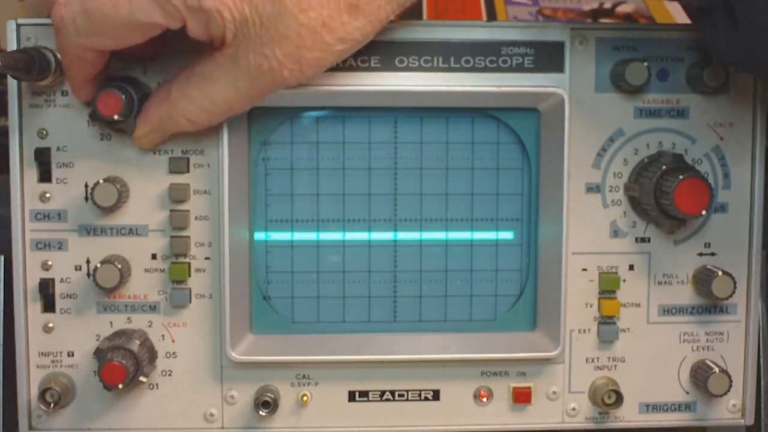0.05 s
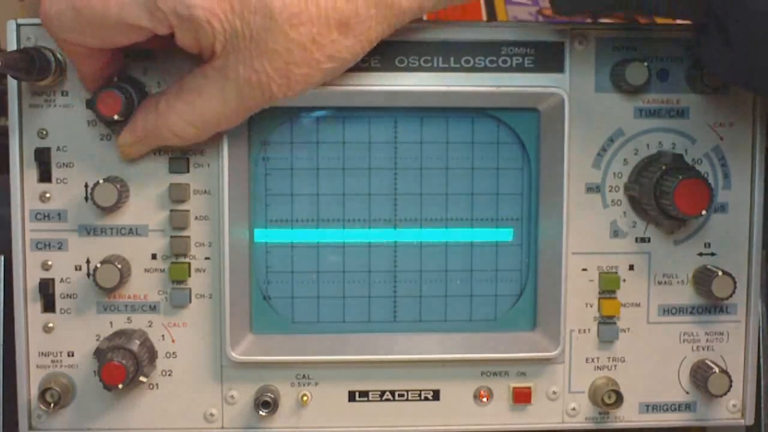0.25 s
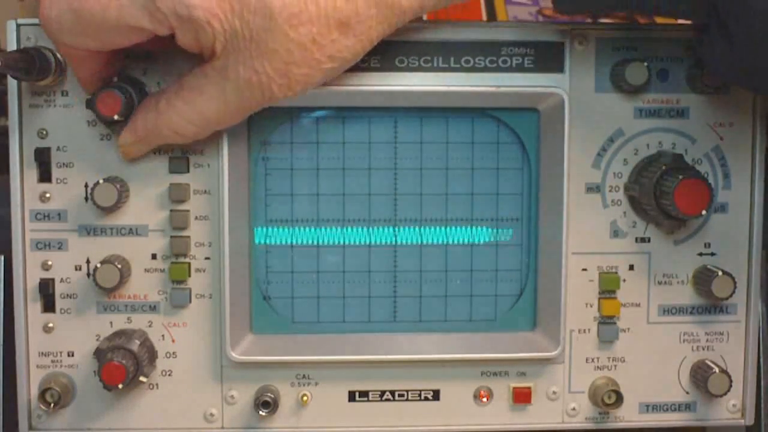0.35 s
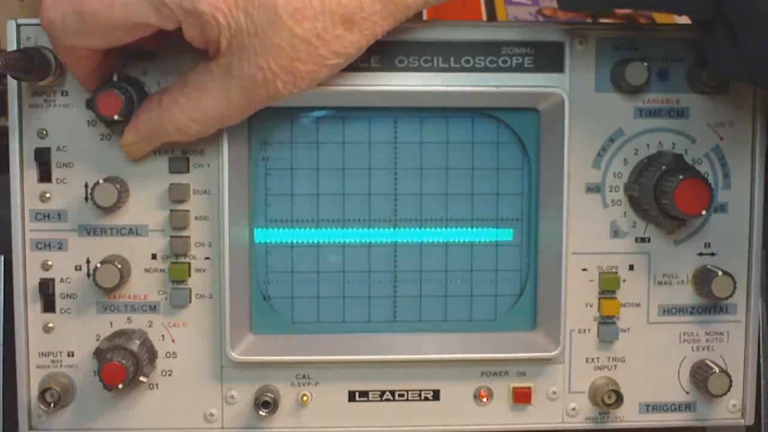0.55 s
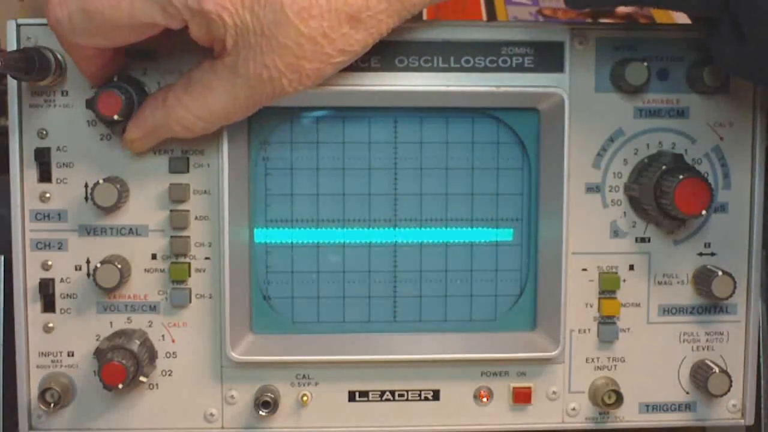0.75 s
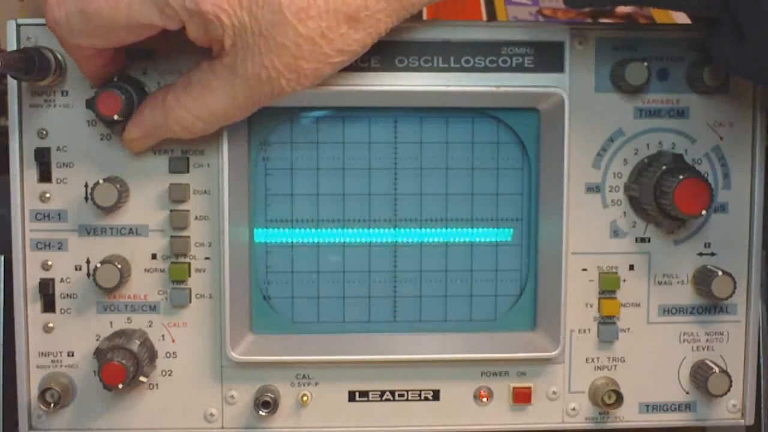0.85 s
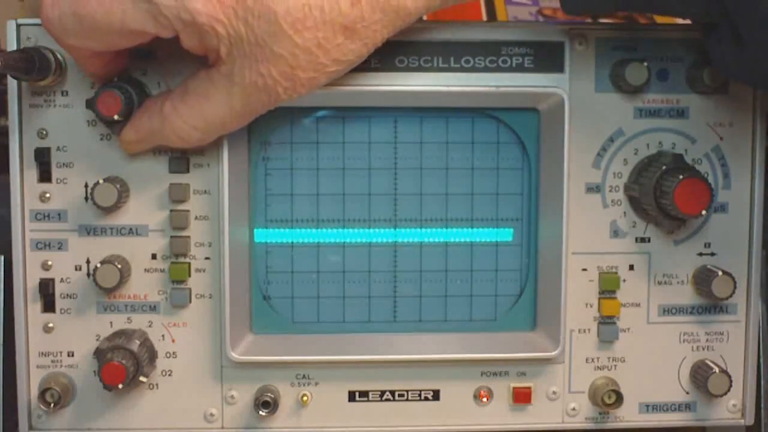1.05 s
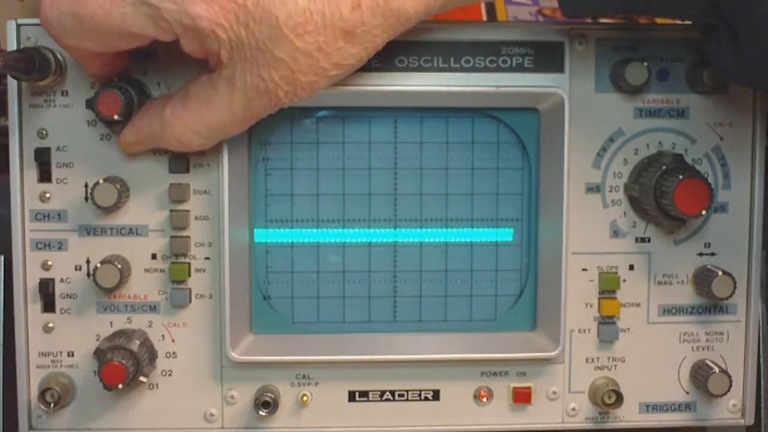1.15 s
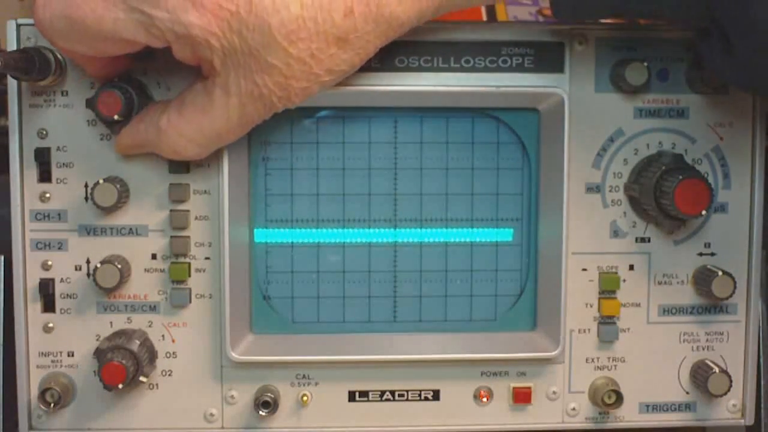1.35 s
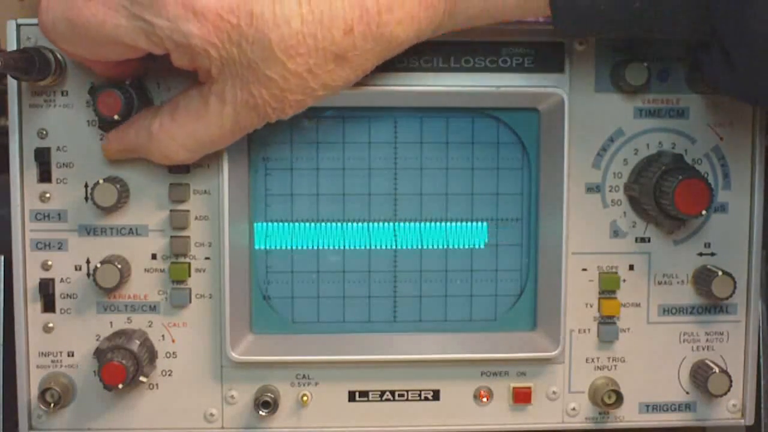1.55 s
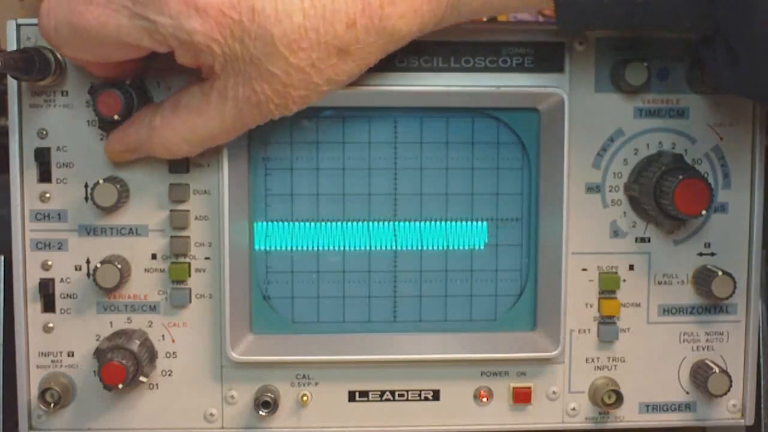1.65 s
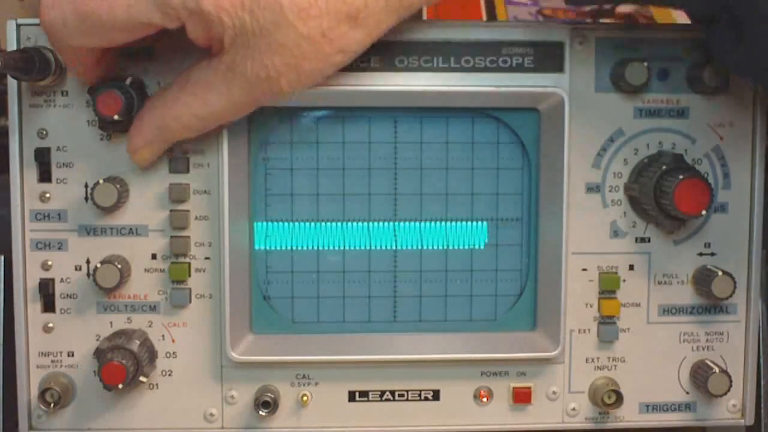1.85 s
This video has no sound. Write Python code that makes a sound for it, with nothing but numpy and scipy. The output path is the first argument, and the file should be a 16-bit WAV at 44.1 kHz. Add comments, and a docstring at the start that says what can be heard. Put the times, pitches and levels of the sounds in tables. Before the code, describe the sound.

Faint hum and room rumble, then a slight scrape and a hard, bright clack of a rotary switch; after a quiet gap a second, similar clack with a fuller low body, heard close, slightly dull treble.

```python
"""At an instrument bench in a room, a rotary selector knob is turned two steps.
Each time the detent spring snaps into its notch, and the blow swells and dies as decaying sines, the case modes.
A dense rattle and the room follow as coloured noise; faint friction scrapes, noise in resonators, lie by the snaps.
Mains hum (wavering sines), room rumble and microphone hiss (coloured noise) lie underneath."""
import sys
import numpy as np
from scipy import signal
from scipy.fft import rfft, irfft
from scipy.io import wavfile

SR = 44100
rng = np.random.default_rng(int(sys.argv[2]) if len(sys.argv) > 2 else 0)


def materialize(psi):
    """Save the field psi as 16-bit PCM at rate SR to the path in sys.argv[1].

    A 1-D psi becomes a single channel; in a 2-D psi each row is a channel.
    """
    bounded = np.clip(np.atleast_2d(psi).T, -1, 1)
    quanta = np.round(bounded * 32767).astype(np.int16)
    wavfile.write(sys.argv[1], SR, quanta)


N = 83790


def from_db(db):
    """Amplitude ratio of a level in dB."""
    return 10 ** (np.asarray(db) / 20)


def rms_one(x):
    """Scale to rms 1."""
    return x / np.sqrt(np.mean(x ** 2) + 1e-20)


def drift(rate_hz):
    """Slow random curve of rms 1: noise through two equal low-pass poles, run at SR / 40."""
    step = 40
    pole = np.exp(-2 * np.pi * rate_hz * step / SR)
    noise = rng.standard_normal(N // step + 2002)
    slow = signal.lfilter([1], [1, -2 * pole, pole ** 2], noise)[2000:]  # settled part
    return np.interp(np.arange(N) / step, np.arange(len(slow)), rms_one(slow))


def coloured(spectrum):
    """Noise of rms 1, its spectrum interpolated in dB over log frequency."""
    hz, db = np.transpose(spectrum)
    bins_hz = np.arange(1, N // 2 + 2) * SR / N
    gain = from_db(np.interp(np.log(bins_hz), np.log(hz), db))
    return rms_one(irfft(rfft(rng.standard_normal(N)) * gain, N))


def ring(drive, hz, t60_s):
    """Two-pole resonator: a unit click sets a decaying sine of height 1 ringing."""
    r, w = from_db(-60 / (t60_s * SR)), 2 * np.pi * hz / SR
    return signal.lfilter([0, np.sin(w)], [1, -2 * r * np.cos(w), r * r], drive + 1e-18)


# Mains hum. Each row: frequency in Hz, level in dB rms about which it wavers.
HUM = [(120, -57.5), (240, -69.5), (360, -70), (540, -72.5)]
HUM_WAVER_DB, HUM_WAVER_HZ = 2.5, 7.4


def hum():
    """Transformer hum: sines on multiples of the mains, each wavering in level on its own."""
    t = np.arange(N) / SR
    total = np.zeros(N)
    for hz, db in HUM:
        amplitude = np.sqrt(2) * from_db(db + HUM_WAVER_DB * drift(HUM_WAVER_HZ))
        total += amplitude * np.sin(2 * np.pi * (hz * t + rng.random()))
    return total


# Colour of rumble and hiss. Each row: frequency in Hz, relative density in dB per Hz.
FLOOR = [(12, -17), (20, 3), (123, -3), (146, -12.5), (178, -9.5), (300, -13), (506, -16.5), (942, -15.5),
         (1590, -22.5), (6080, -28), (7050, -28.5), (7600, -82), (9880, -78.5), (16700, -120)]
# Their course. Each row: time in seconds, level in dB rms.
FLOOR_LEVEL = [(0, -44.5), (0.402, -47), (1.452, -46.5), (1.7, -44.5), (1.9, -45.5)]


def floor():
    """Room rumble and microphone hiss: coloured noise whose level moves slightly."""
    time_s, level_db = np.transpose(FLOOR_LEVEL)
    return from_db(np.interp(np.arange(N) / SR, time_s, level_db)) * coloured(FLOOR)


# Scrapes of the detent. Each row: start in seconds, length in seconds, level in dB of the noise
# driving the resonance, resonance in Hz, its t60 in seconds.
SLIPS = [(0.1883, .004, -49, 5000, .008), (.189, 0.016, -50, 1545, .012), (0.192, 0.0081, -53, 6580, .01),
         (1.521, .002, -39, 2500, .002)]


def slip():
    """Friction: short noise bursts with half-sine envelopes, each driving one resonance."""
    t = np.arange(N) / SR
    total = np.zeros(N)
    for start_s, length_s, db, hz, t60_s in SLIPS:
        envelope = np.sin(np.pi * np.clip((t - start_s) / length_s, 0, 1))
        total += ring(from_db(db) * rng.standard_normal(N) * envelope, hz, t60_s)
    return total


# Detent snaps. Each row: start in seconds, level in dB added to every mode, drive level of the tail in dB.
SNAPS = [(.2022, -15.5, -18), (1.5188, -16, -16.5)]
# Switch and case modes. Each row: frequency in Hz, relative level in dB in the first snap,
# the same in the second, time to the peak of the swell in seconds, t60 after it in seconds.
CASE = [(236.3, -21.5, -15.5, 0.022, 0.093), (262, -35, -26, 0.04, 0.48), (308, -31.5, -32.5, 0.054, 0.57),
        (364, -8, -9.5, 0.0029, 0.035), (3860, -24, -24.5, 0.026, 0.14), (766, -7, -17, 0.005, 0.029),
        (896, -41, -22, 0.0084, 0.21), (1171, -7, -13.5, 0.0083, 0.033), (1104, -16.5, -13, 0.013, 0.11),
        (1371, -14, -14.5, .008, 0.042), (1625, -1.5, -3, 0.0073, 0.016),
        (2114, -13.5, -20.5, 0.0031, 0.039), (2470, -10.5, -13.5, 0.0037, 0.016),
        (3057, -3, -6.5, 0.0027, 0.013), (3396, -10, -10.5, .012, 0.076), (3597, 3.2, 2.1, 0.0062, 0.0067),
        (3926, -3.5, -4.5, 0.0034, .02), (4250, -7.5, -4.5, .004, 0.031), (4600, -3.5, -8, 0.0058, 0.011),
        (4930, -5.5, -9.5, .005, 0.022), (5360, -6, -4.5, 0.0057, 0.028), (5547, -16, -12.5, 0.013, 0.056),
        (5690, -2, -8.5, 0.0056, .02), (6090, -2, -1.5, 0.0068, 0.0088), (6720, -1, -5, .0035, 0.011),
        (7320, -10, -10.5, 0.002, .02)]


def switch():
    """The blow reaches switch and case: each mode swells as sin squared, then dies exponentially."""
    out, t = np.zeros(N + SR), np.arange(SR // 2) / SR
    for k, (start_s, snap_db, _) in enumerate(SNAPS):
        start = int(start_s * SR)
        for hz, *mode_db, peak_s, t60_s in CASE:
            rise = np.sin(np.pi / 2 * t / peak_s) ** 2
            decay = from_db(-60 * np.maximum(t - peak_s, 0) / t60_s)
            swell = np.where(t < peak_s, rise, decay)
            tone = np.sin(2 * np.pi * (hz * t + rng.random()))
            out[start:start + len(t)] += from_db(snap_db + mode_db[k]) * swell * tone
    return out[:N]


# Colour of the dense tail. Each row: frequency in Hz, relative density in dB per Hz.
TAIL = [(88, -42), (150, -16.5), (289, -3.5), (540, -16), (814, -7.5), (1110, -5), (1760, -7),
        (2080, -19.5), (3080, -8), (3450, -3), (5040, -11.5), (5470, -7.5), (6560, -5), (6890, -8.5),
        (7600, -47), (9880, -76), (16700, -120)]
TAIL_RISE_S, TAIL_T60_S = 0.0076, 0.13
ROOM_DB, ROOM_T60_S = -30.5, 0.45  # dB relative to the rattle


def tail():
    """Modes and echoes too many to count: coloured noise rises, then dies in a fast and a slow decay."""
    level = np.zeros(N)
    for start_s, _, db in SNAPS:
        t = np.maximum(np.arange(N) / SR - start_s, 0)
        rise = 1 - np.exp(-(t / TAIL_RISE_S) ** 2)
        rattle = from_db(-60 * t / TAIL_T60_S)
        room = from_db(ROOM_DB - 60 * t / ROOM_T60_S)
        level += from_db(db) * rise * (rattle + room)
    return level * coloured(TAIL)


def scene():
    """Sum of all layers, one channel."""
    return (hum() + floor() + slip() + switch() + tail())[None]


ROLLOFF_HZ, CUTOFF_HZ = 7600, 7849  # -3 dB point; stopband edge


def record(dry):
    """The treble rolls off in a Butterworth low-pass, then a steep Chebyshev one cuts the top by 32 dB."""
    rolloff = signal.butter(6, ROLLOFF_HZ, fs=SR, output="sos")
    cutoff = signal.cheby2(10, 32, CUTOFF_HZ, fs=SR, output="sos")
    return signal.sosfilt(cutoff, signal.sosfilt(rolloff, dry))


dry = scene()
out = record(dry)
materialize(out)
```